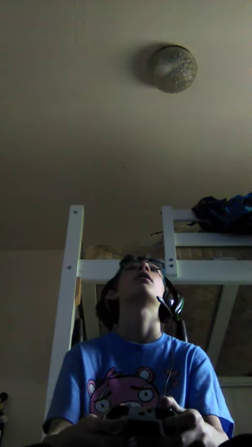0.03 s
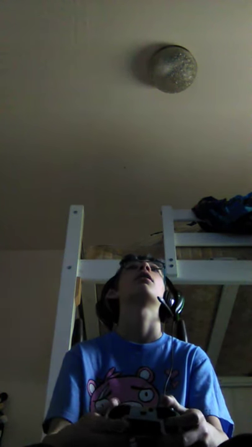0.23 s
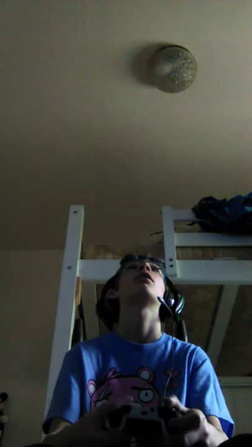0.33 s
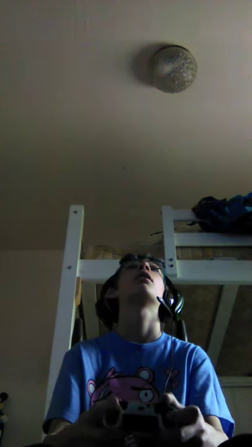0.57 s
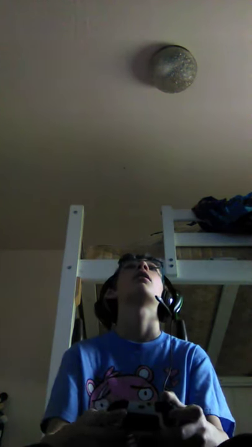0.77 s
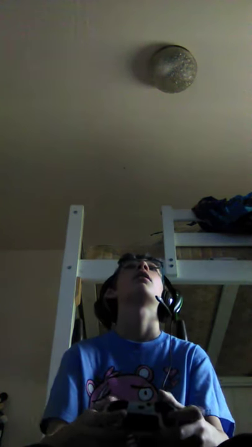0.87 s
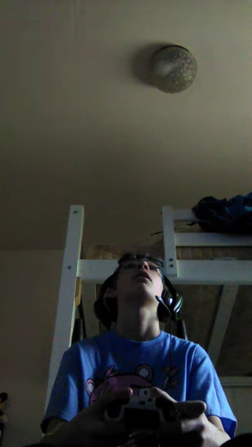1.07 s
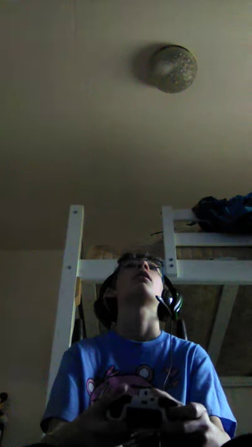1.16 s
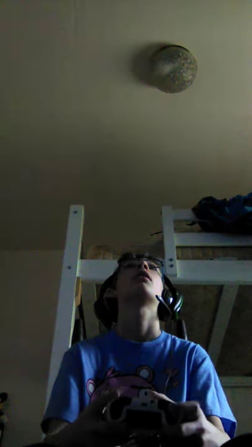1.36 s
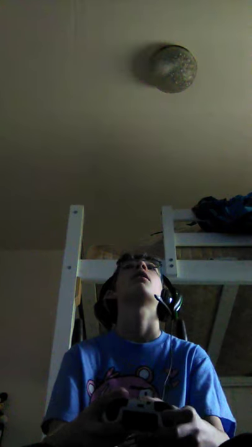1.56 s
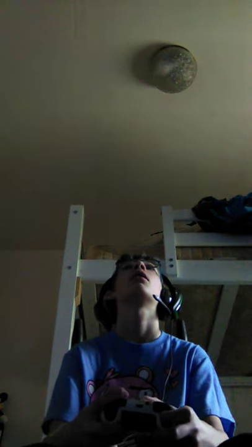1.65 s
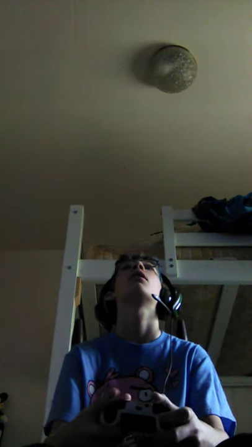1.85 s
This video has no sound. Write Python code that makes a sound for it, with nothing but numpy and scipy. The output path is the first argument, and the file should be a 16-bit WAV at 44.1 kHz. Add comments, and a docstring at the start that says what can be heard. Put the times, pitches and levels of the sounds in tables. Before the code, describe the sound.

Game controller buttons and sticks click unevenly, close by in a quiet room.

```python
"""A small bedroom, where a plastic game controller is played close to the microphone.
Buttons snap down brightly and spring back with a duller knock of the shell; sticks and caps tick between.
Each click is a burst of plastic chatter over dying resonances, and one knock leaves a thin tone hanging.
The ceiling throws each click back, the room rings briefly, and a faint mains hum lies underneath."""
import sys
import numpy as np
from scipy import signal
from scipy.fft import rfft, irfft
from scipy.io import wavfile

SR = 44100
rng = np.random.default_rng(int(sys.argv[2]) if len(sys.argv) > 2 else 0)


def wrap_up_sound(samples):
    """Save the sound to the file named by the first command line argument, as 16-bit audio."""
    columns = np.atleast_2d(samples).T
    # keep every value between -1 and 1, then stretch to whole-number steps
    tamed = np.clip(columns, -1, 1)
    steps = np.round(tamed * 32767).astype(np.int16)
    wavfile.write(sys.argv[1], SR, steps)


N = 83790
T = np.arange(SR // 3 // 100 * 100) / SR   # time axis of one click, in seconds


def from_db(db):
    """Decibels to gain."""
    return 10 ** (np.asarray(db) / 20)


def at_hz(curve, hz):
    """Read a curve on a log-frequency axis."""
    points_hz, values = np.transpose(curve)
    return np.interp(np.log(np.maximum(hz, 1)), np.log(points_hz), values)


def unit(x):
    """Scale each channel to unit energy."""
    return x / np.sqrt(np.sum(x ** 2, axis=-1, keepdims=True) + 1e-20)


def tilt_db(hz, db_per_octave, pivot_hz):
    """A harder contact is brighter, a softer one duller: a tilt between 1 and 10 kHz."""
    return db_per_octave * np.log2(np.clip(hz, 1000, 10000) / pivot_hz)


def equalise(x, curve, tilt=0, pivot_hz=1000):
    """Minimum-phase EQ, which keeps attacks sharp."""
    n = len(T)
    hz = np.fft.rfftfreq(n, 1 / SR)
    gain = from_db(at_hz(curve, hz) + tilt_db(hz, tilt, pivot_hz))
    cepstrum = irfft(np.log(gain), n)
    cepstrum[1:n // 2] *= 2
    cepstrum[n // 2 + 1:] = 0
    return irfft(rfft(x, n) * np.exp(rfft(cepstrum)), n)


def burst(rise_s):
    """A short swell of noise with an even spectrum, peaking near rise_s."""
    envelope = T / rise_s * np.exp(-T / rise_s)
    spectrum = rfft(rng.standard_normal(len(T)) * envelope)
    even = irfft(spectrum / (abs(spectrum) + 1e-12), len(T))
    return unit(even * np.sqrt(envelope))


def at_mics(x, lag_s=0.00013):
    """The right microphone hears the controller slightly later."""
    return np.array([x, np.interp(T - lag_s, T, x, left=0)])


def chatter(rise_s, likeness=0.27):
    """Plastic parts meeting, partly alike at the two microphones."""
    centre = at_mics(burst(rise_s))
    wide = np.array([burst(rise_s), burst(rise_s)])
    return np.sqrt(likeness) * centre + np.sqrt(1 - likeness) * wide


def mode(hz, db, t60_s, rise_s=0.00056, radiation_hz=420):
    """One resonance, a dying sine; the small shell gives off little below radiation_hz."""
    decay_s = t60_s / np.log(1000)
    envelope = (1 - np.exp(-T / rise_s)) * np.exp(-T / decay_s)
    ring = 2 * from_db(db) / (decay_s * SR) * envelope * np.sin(2 * np.pi * hz * T)
    low_cut = signal.butter(2, radiation_hz, "high", fs=SR, output="sos")
    return at_mics(signal.sosfilt(low_cut, ring + 1e-18))


# Tone of the room's rumble and hiss: freq_hz, gain_db
AIR_EQ = [(15, -21.5), (30, -23), (50, 1), (75, -6.5), (110, 3.5), (150, -9), (200, -17), (400, -24.5),
          (700, -30), (1500, -37.5), (4000, -41.5), (11000, -39), (16000, -43.5)]
# Centred lows, wide highs: freq_hz, left_right_likeness
AIR_LIKENESS = [(50, 1), (160, .97), (400, 0.93), (1000, .1), (16000, 0.022)]
def room_tone(level_db=-63.5):
    """A steady bed of low rumble and faint hiss."""
    hz = np.fft.rfftfreq(N, 1 / SR)
    mid, side = rfft(rng.standard_normal((2, N))) * from_db(at_hz(AIR_EQ, hz))
    likeness = np.clip(at_hz(AIR_LIKENESS, hz), 0, 1)
    spectrum = np.sqrt(1 + likeness) * mid + np.sqrt(1 - likeness) * side * [[1], [-1]]
    return from_db(level_db) * unit(irfft(spectrum, N)) * np.sqrt(N)


def mains_hum(pitch_hz=119.3, level_db=-64.5, waver_depth=0.072):
    """A faint mains tone whose level wavers slightly."""
    t = np.arange(N) / SR
    waver = np.interp(t, np.linspace(0, t[-1], 20), rng.standard_normal(20))
    tone = np.sqrt(2) * np.sin(2 * np.pi * (pitch_hz * t + rng.random()))
    return from_db(level_db) * (1 + waver_depth * waver) * tone


def button_slides(lead_s=0.0044, relative_db=-23.5):
    """Each button slides faintly in its guide just before it snaps or knocks."""
    out = np.zeros((2, N))
    for start_s, level_db, *_ in SNAPS + KNOCKS:
        slide = equalise(chatter(rise_s=0.0012), KNOCK_EQ)
        add_in_room(out, start_s - lead_s, level_db + relative_db, slide)
    return out


# Resonances of the plastic shell, shared with the snaps: pitch_hz, level_db, t60_s
SHELL_MODES = [(1147, -15, 0.021), (1981, -1.5, 0.019), (2606, -12.5, 0.027), (3034, -1, 0.0071),
               (4120, -10, 0.018), (4616, -4.5, .011)]
# Mid-heavy tone of a knock: freq_hz, gain_db
KNOCK_EQ = [(200, -43), (400, -33.5), (600, -27.5), (1000, -9.5), (1550, -21), (2000, -11), (3000, -9.5),
            (4400, -9.5), (5400, -14), (6400, -14.5), (7600, -21.5), (9800, -21), (11500, -35.5),
            (15500, -47)]
# Knock cues: start_s, level_db, tilt_db_per_octave, hollow_hz, hollow_db
KNOCKS = [(0.1295, -1, 1, 980, -21), (0.2483, 4.5, 5.5, 790, -13.5), (0.6314, 2, 3, 778, -2),
          (0.8412, .5, -1.5, 958, -21.5), (1.3280, -5, 2.5, 799, 8), (1.3494, -3.5, 9.5, 820, -7),
          (1.6292, -1, 2, 900, -29), (1.6388, -0.5, 1.5, 920, -5)]
def shell_knocks(pan_db=0.33):
    """A button or stick hits its stop, ringing the shell and the hollow inside it."""
    out = np.zeros((2, N))
    for start_s, level_db, tilt, hollow_hz, hollow_db in KNOCKS:
        crack = equalise(chatter(rise_s=0.00076), KNOCK_EQ, tilt, pivot_hz=2910)
        shell = sum(mode(hz, db + tilt_db(hz, tilt, pivot_hz=2650), t60_s)
                    for hz, db, t60_s in SHELL_MODES)
        hollow = mode(hollow_hz, hollow_db, t60_s=0.02)
        add_in_room(out, start_s, level_db, crack + shell + hollow)
    return out * from_db([[-pan_db], [pan_db]])


# Thin tone of a tick: freq_hz, gain_db
TICK_EQ = [(200, -47.5), (400, -39.5), (900, -18), (1500, -28.5), (2500, -17.5), (4500, -18), (6000, -15.5),
           (8000, -16.5), (9600, -14), (11000, -21.5), (12300, -38), (15500, -38.5)]
# Tick cues: start_s, level_db, tilt_db_per_octave, thud_hz, thud_db
TICKS = [(0.263, 5, -1, 900, -32.5), (0.2853, 5.5, -0.5, 850, -13.5), (.4670, -7, -3.5, 540, -3),
         (.4705, -0.5, 9, 620, -12.5), (.4880, -8, -3.5, 750, -4.5), (0.905, -5.5, -0.5, 970, -30),
         (0.9166, 2.5, -1, 950, -24), (0.9287, -1, -1.5, 940, -11.5), (.9412, 3, 2.5, 950, -24),
         (1.031, -9, 4, 900, -11), (1.037, 2.5, -1, 900, -42), (1.1575, -4.5, 19, 600, -25),
         (1.1777, -17.5, -3.5, 560, -4.5), (1.2693, -20, -1.5, 900, -29), (1.3603, 3, 0.5, 800, -40.5),
         (1.5493, -5, 9, 700, -26), (1.5701, -3.5, 1, 660, -8.5), (1.6902, -4.5, 8, 800, -26),
         (1.6974, 2.5, 2.5, 850, -16.5), (1.7369, -27, -2, 900, -24), (1.7832, -7.5, 2, 800, -29),
         (1.808, -15.5, -2.5, 600, -7)]
def stick_ticks(contact_db=-3.5, scuff_db=-4):
    """Sticks and caps tick lightly inside a short scuff of the thumb, some with a soft thud."""
    out = np.zeros((2, N))
    for start_s, level_db, tilt, thud_hz, thud_db in TICKS:
        contact = from_db(contact_db) * chatter(rise_s=0.00074)
        scuff = from_db(scuff_db) * chatter(rise_s=0.0022)
        tick = equalise(contact + scuff, TICK_EQ, tilt, pivot_hz=7450)
        thud = mode(thud_hz, thud_db, t60_s=0.015)
        add_in_room(out, start_s, level_db, tick + thud)
    return out


# Bright tone of a snap: freq_hz, gain_db
SNAP_EQ = [(300, -23.5), (600, -24), (1000, -11.5), (1500, -15.5), (2200, -8), (3200, -2.5), (5200, 6),
           (6300, 0.5), (7500, 2), (10200, 6), (11300, -10), (12300, -24), (15500, -52)]
# Snap cues: start_s, level_db, tilt_db_per_octave, ring1_hz, ring1_db, ring2_hz, ring2_db
SNAPS = [(0.3636, 0.5, 0.26, 8230, 15.5, 4230, 10), (1.0395, -0.5, 0.6, 10190, 17, 5214, 16),
         (1.4444, 2, -0.5, 8170, 15, 6700, 12)]
def button_snaps(ring_t60_s=0.0084, pan_db=0.7):
    """A button snaps down, sounding the shell and two high rings of its own."""
    out = np.zeros((2, N))
    for start_s, level_db, tilt, ring1_hz, ring1_db, ring2_hz, ring2_db in SNAPS:
        crack = equalise(chatter(rise_s=0.001), SNAP_EQ, tilt, pivot_hz=6140)
        shell = sum(mode(hz, db, t60_s) for hz, db, t60_s in SHELL_MODES)
        rings = mode(ring1_hz, ring1_db, ring_t60_s) + mode(ring2_hz, ring2_db, ring_t60_s)
        add_in_room(out, start_s, level_db, crack + shell + rings)
    return out * from_db([[-pan_db], [pan_db]])


# A faint lingering ring: start_s, pitch_hz, level_db, t60_s
SPRING_RINGS = [(.6312, 750, -6, .38)]
def spring_ring():
    """A thin tone, probably a spring, hangs on after one knock."""
    out = np.zeros((2, N))
    for start_s, pitch_hz, level_db, t60_s in SPRING_RINGS:
        add_in_room(out, start_s, level_db, mode(pitch_hz, 0, t60_s))
    return out


# Early reflections, set against the tail: delay_s, level_db, smear_s
REFLECTIONS = [(.0096, -9, 0.00036), (.0129, -14, 0.00065)]
# Reverb decay by band: freq_hz, t60_s
REVERB_DECAY = [(300, 0.24), (750, 0.16), (1500, 0.2), (4000, 0.16), (10000, 0.21), (13000, 0.28)]
# Tone of the reverb: freq_hz, gain_db
REVERB_EQ = [(300, -5.5), (800, 3), (2500, 1.5), (5000, 0.5), (9000, -1), (11000, -4), (13000, 6),
             (15500, 5)]
def bedroom(x, onset_s=0.012, scatter_db=2.5):
    """Near scatter, reflections from ceiling and walls, then a diffuse tail dying band by band."""
    hz = np.fft.rfftfreq(len(T), 1 / SR)
    noise = rfft(rng.standard_normal((2, len(T))))
    tail = 0
    for band_hz, t60_s in REVERB_DECAY:
        band = at_hz([(f, float(f == band_hz)) for f, _ in REVERB_DECAY], hz)
        tail = tail + irfft(noise * band, len(T)) * from_db(-60 * T / t60_s)
    build_up = np.where(T < onset_s, from_db(scatter_db) * T / onset_s, 1)
    response = unit(tail * build_up)
    for delay_s, level_db, smear_s in REFLECTIONS:
        reflection = [burst(smear_s), burst(smear_s)]
        response += from_db(level_db) * np.roll(reflection, int(delay_s * SR), axis=1)
    return signal.fftconvolve(x, equalise(response, REVERB_EQ), axes=1)[:, :len(T)]


def add_in_room(out, start_s, level_db, sound):
    """Mix in a sound with a reverb of its own, because the hands keep moving."""
    start = int(start_s * SR)
    with_reverb = from_db(level_db) * (sound + bedroom(sound))
    out[:, start:start + len(T)] += with_reverb[:, :N - start]


def scene(bed_pan_db=0.46):
    """The controller over a quiet bed that leans slightly left."""
    controller = button_snaps() + shell_knocks() + stick_ticks() + button_slides() + spring_ring()
    bed = room_tone() + mains_hum()
    return controller + bed * from_db([[bed_pan_db], [-bed_pan_db]])


def record(dry, cutoff_hz=15400):
    """A steep high cut takes off the very top."""
    return signal.sosfilt(signal.butter(20, cutoff_hz, fs=SR, output="sos"), dry)


dry = scene()
out = record(dry)
wrap_up_sound(out)
```